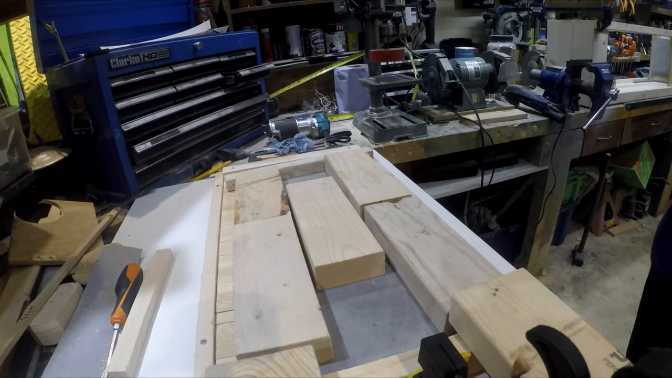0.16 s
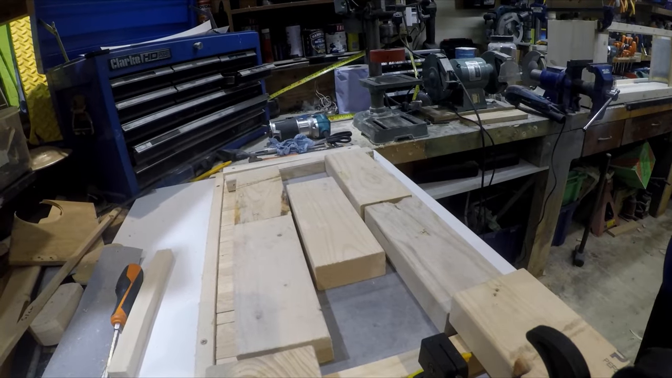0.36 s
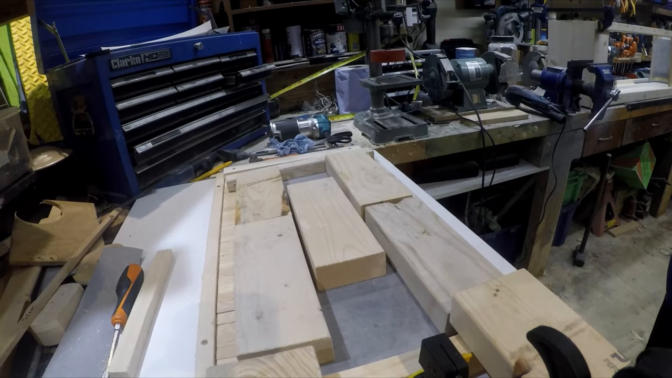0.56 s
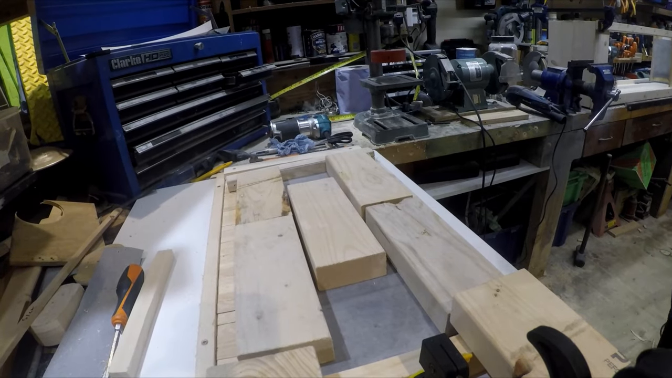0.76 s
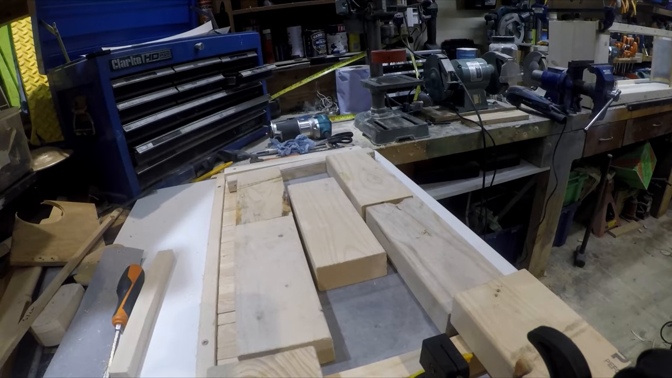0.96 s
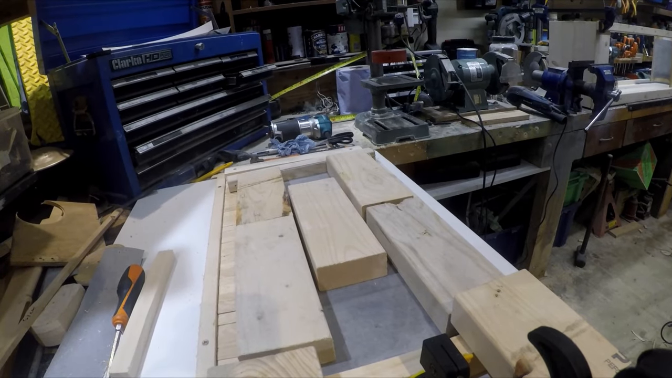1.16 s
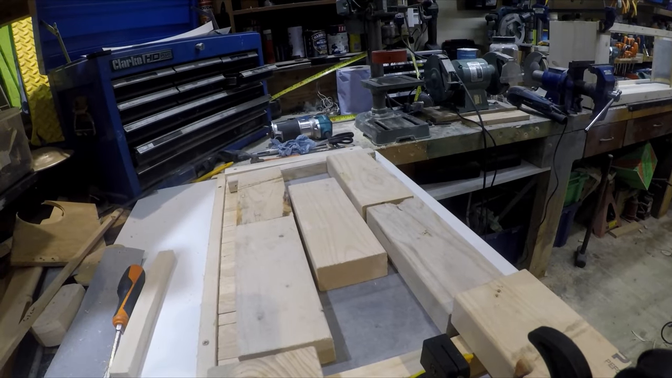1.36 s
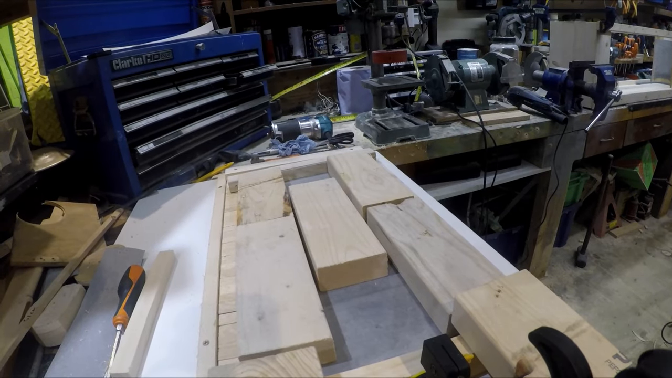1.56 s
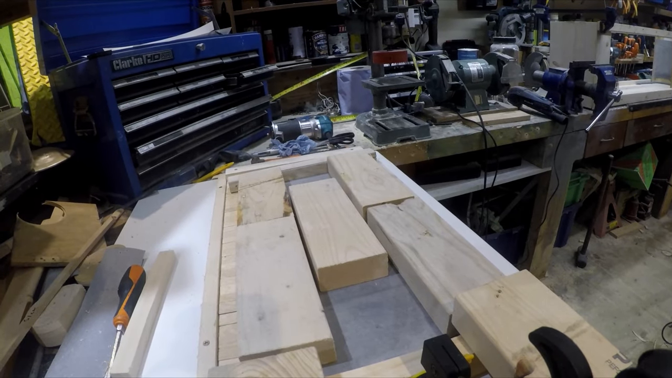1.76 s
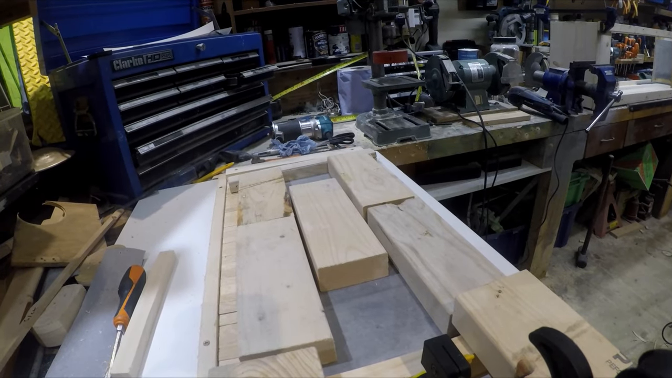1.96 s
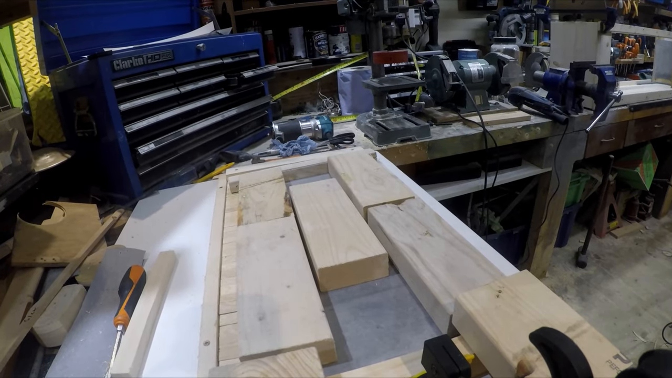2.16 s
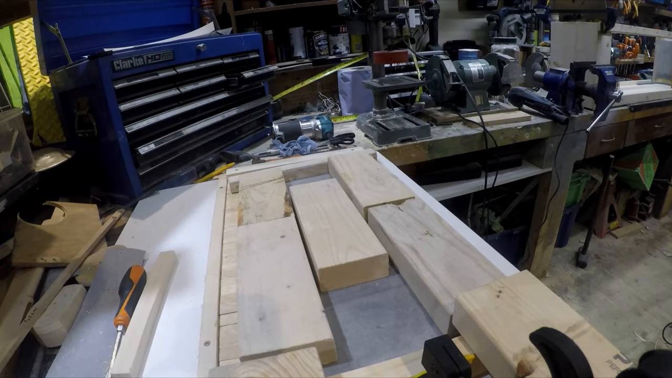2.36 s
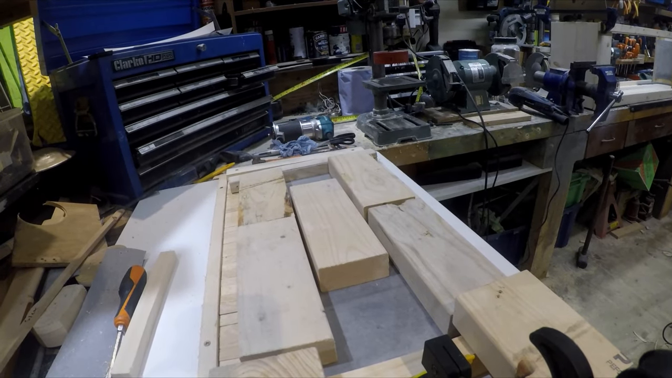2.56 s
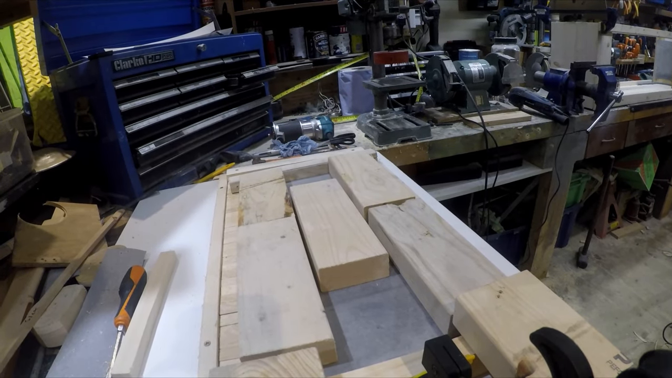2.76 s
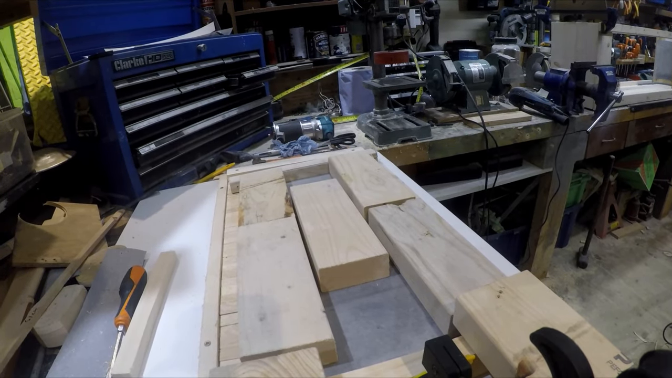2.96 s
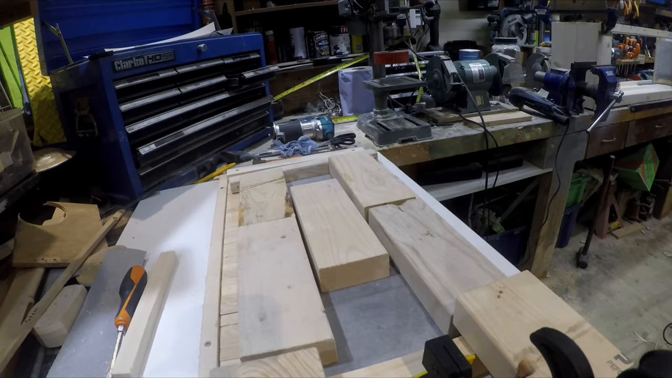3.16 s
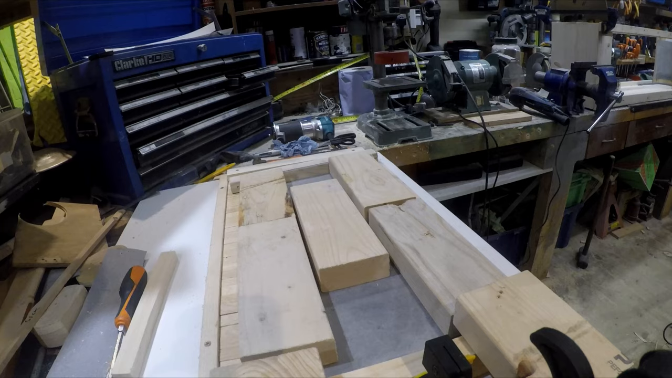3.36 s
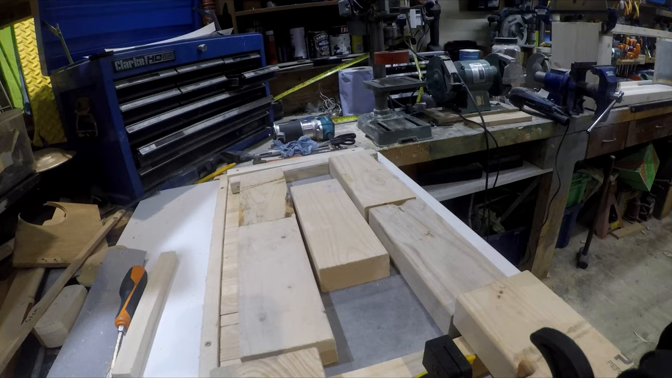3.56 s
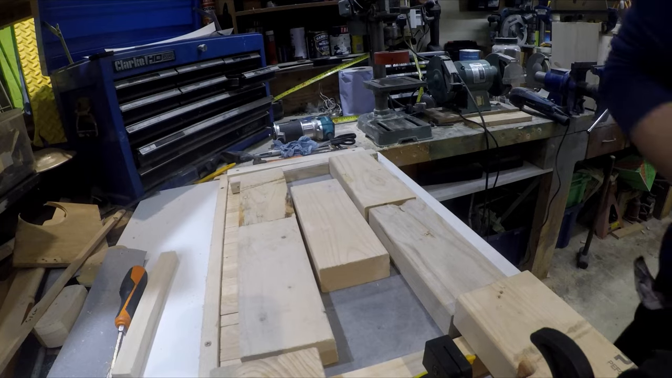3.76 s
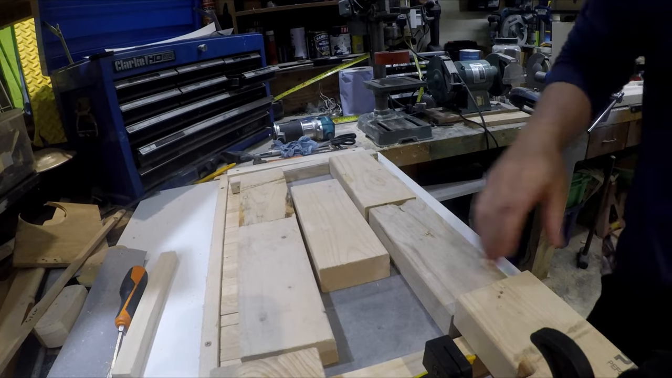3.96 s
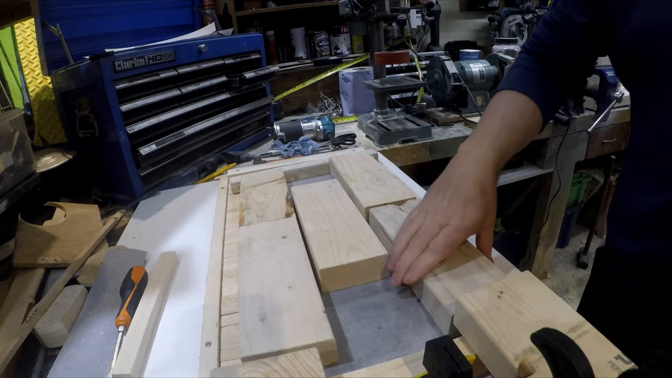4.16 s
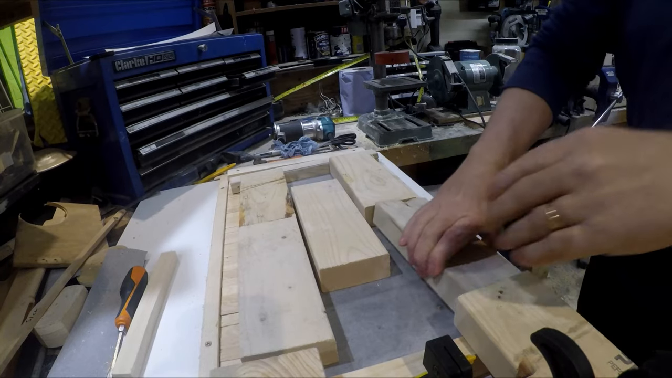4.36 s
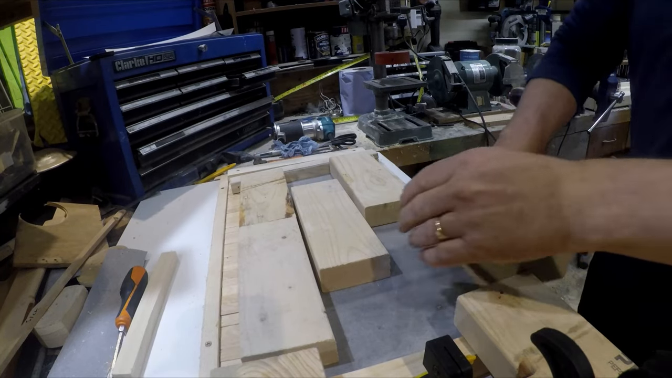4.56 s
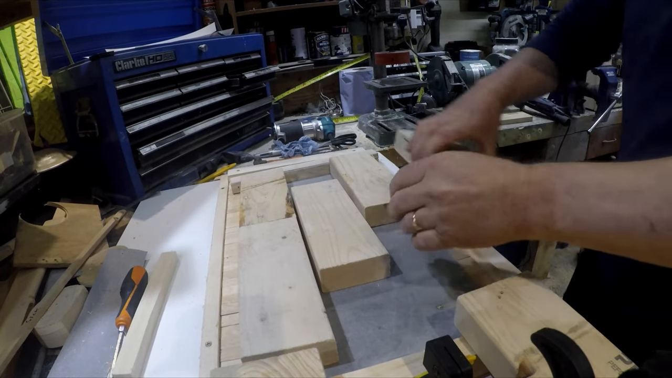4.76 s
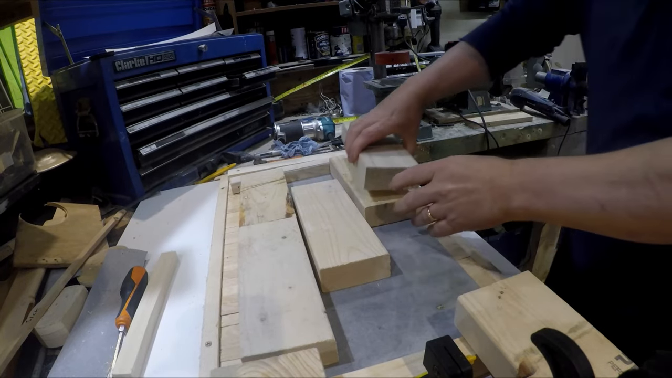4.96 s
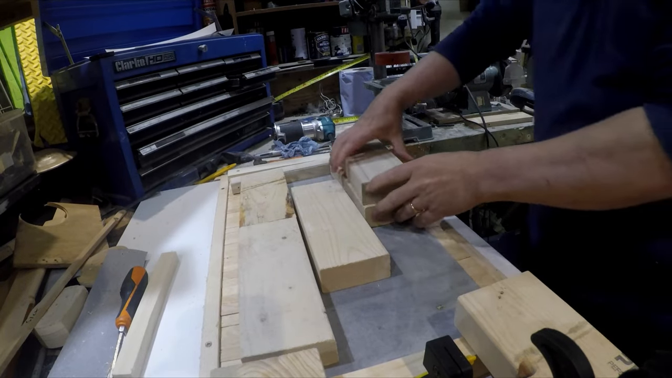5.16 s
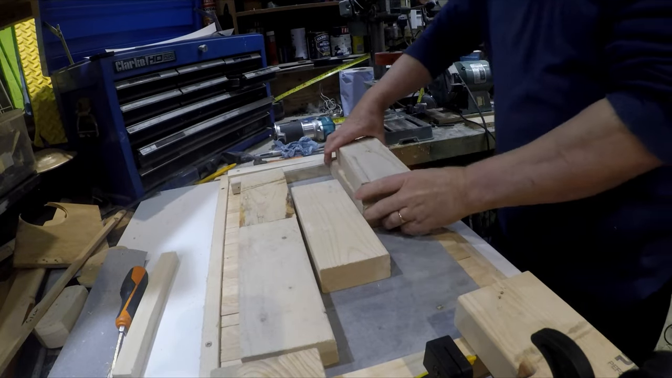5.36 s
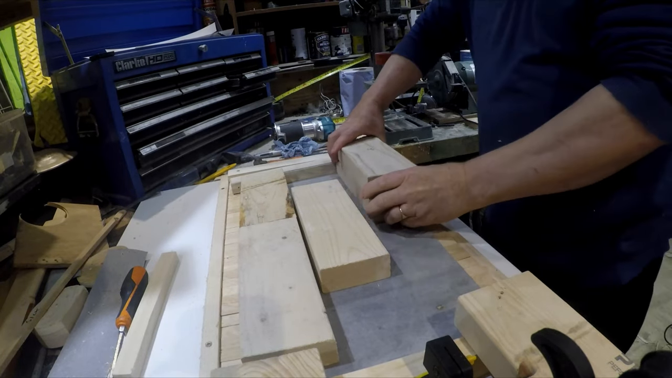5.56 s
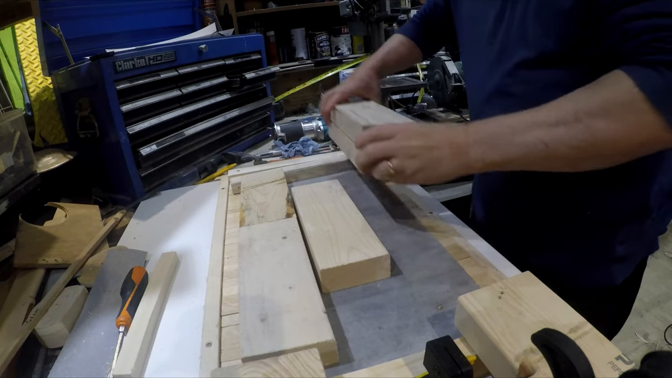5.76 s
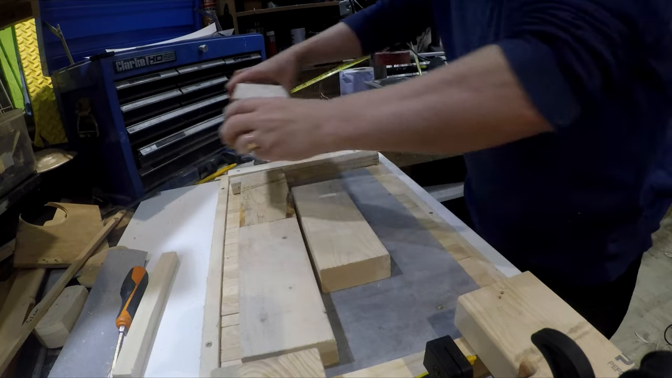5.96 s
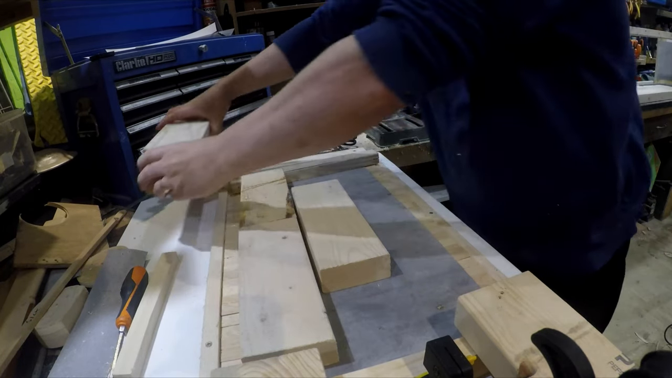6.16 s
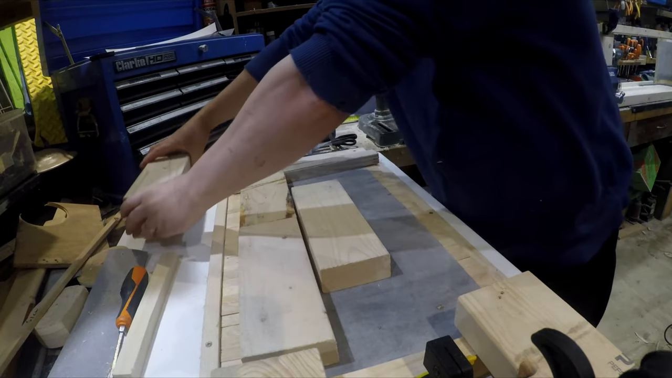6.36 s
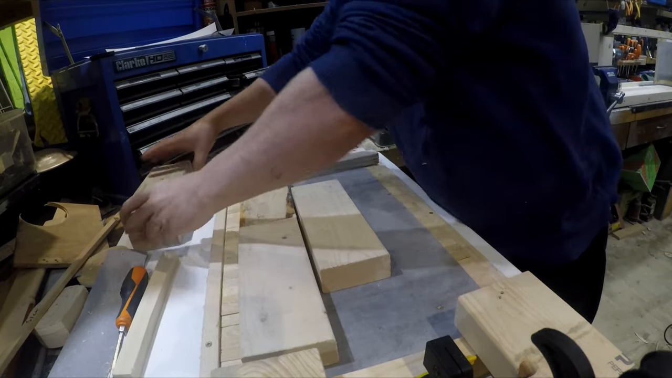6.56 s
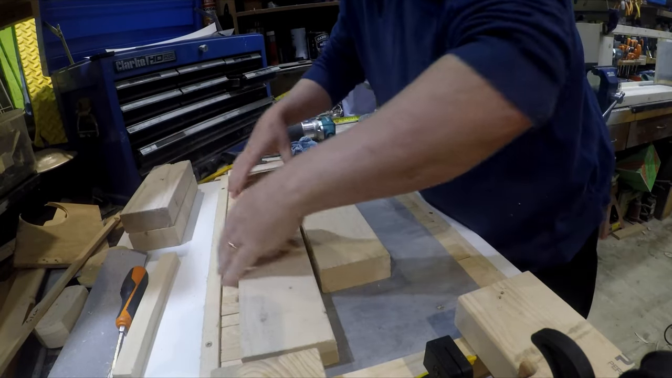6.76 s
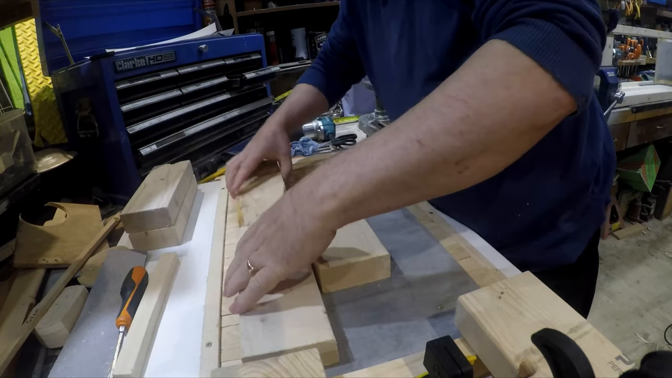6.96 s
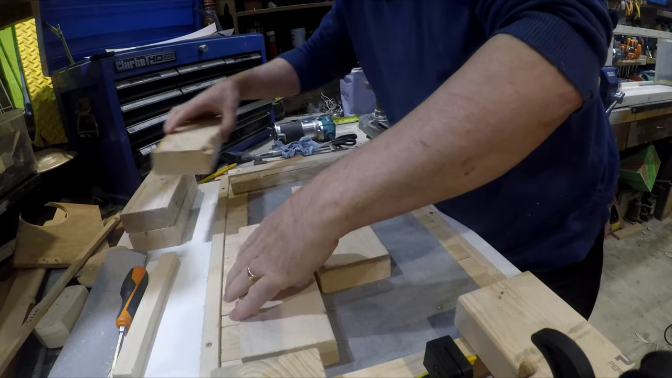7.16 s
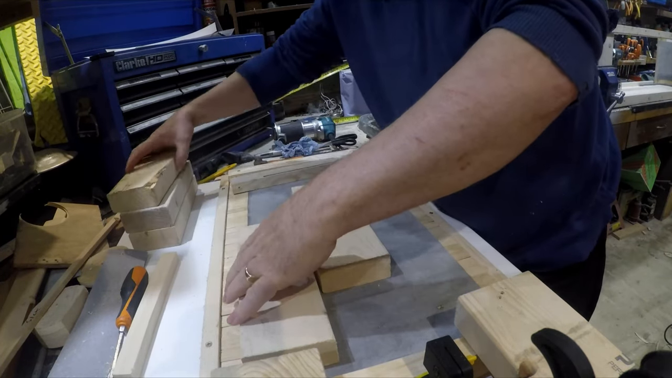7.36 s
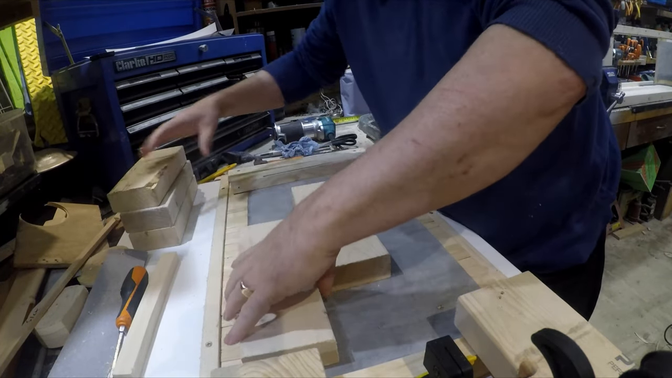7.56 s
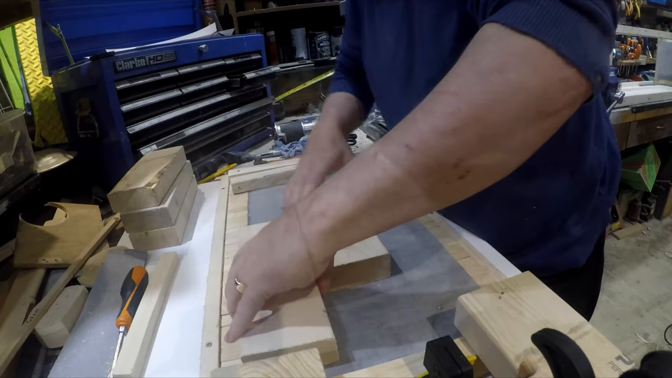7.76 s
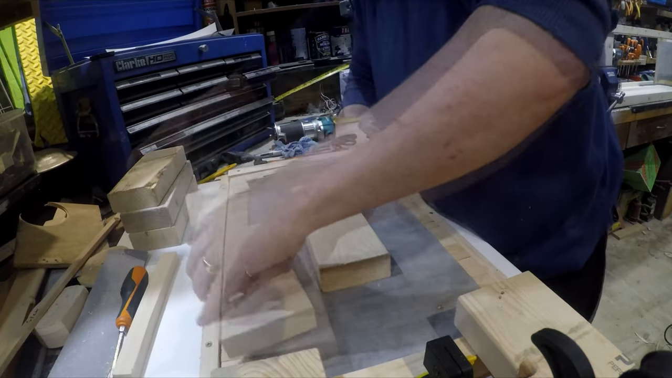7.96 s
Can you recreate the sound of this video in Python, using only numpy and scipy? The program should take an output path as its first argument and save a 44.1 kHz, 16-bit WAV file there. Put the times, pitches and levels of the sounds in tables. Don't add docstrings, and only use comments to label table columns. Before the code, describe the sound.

Wooden blocks bump, scrape and clack irregularly on a resonant workbench, with deep frame thuds and a buzzy rattle, then get stacked and fade out.

```python
import sys
import numpy as np
from scipy import signal
from scipy.fft import rfft, irfft, next_fast_len
from scipy.io import wavfile
from scipy.ndimage import uniform_filter1d

SR = 44100
rng = np.random.default_rng(int(sys.argv[2]) if len(sys.argv) > 2 else 0)


def store_wav(level_fs):
    pcm = np.round(np.clip(np.atleast_2d(level_fs), -1, 1) * 32767)
    wavfile.write(sys.argv[1], SR, pcm.T.astype(np.int16))


def convert_level_to_amplitude(level_db):
    exponent = np.asarray(level_db, float) / 20
    return 10 ** exponent


N = 357210


def evened(x):
    return x / np.sqrt(np.mean(x ** 2) + 1e-20)


def curve(rows, column):
    rows = np.array(rows)
    return np.interp(np.arange(N) / SR, rows[:, 0], rows[:, column])


def colour(x, points, lag_s=0.):
    size = next_fast_len(N + 4096)
    hz = np.arange(size // 2 + 1) * SR / size
    f, db = np.transpose(points)
    gain = convert_level_to_amplitude(np.interp(np.log(hz + 1), np.log(f + 1), db))
    delay = np.exp(-2j * np.pi * hz * lag_s)
    return irfft(rfft(x, size) * gain * delay, size)[..., :N]


def resonate(x, modes):
    out = 0
    for hz, width, db in modes:
        r = np.exp(-np.pi * width / SR)
        ring = signal.lfilter([1, 0, -1], [1, -2 * r * np.cos(2 * np.pi * hz / SR), r * r], x)
        out = out + convert_level_to_amplitude(db) * (1 - r) * ring
    return out


def pair(same):
    a, b = rng.standard_normal((2, N))
    return np.array([a, same * a + np.sqrt(1 - same ** 2) * b])


def lumps(width, db):
    smooth = uniform_filter1d(rng.standard_normal(N), width)
    smooth = uniform_filter1d(smooth, width)
    return convert_level_to_amplitude(db * evened(smooth))


def changed_level(before_db, after_db, ramp_s=0.49):
    change_s = 6.56
    share = np.clip((np.arange(N) / SR - change_s) / ramp_s, 0, 1)
    return before_db + share * (after_db - before_db)


# middle t/s, half length t/s, scrape level/dB, brushing hiss level/dB,
# scrape f/Hz
DRAGS = [(.01, 0.02, -40.5, -72, 540), (0.457, 0.12, -49, -91, 492), (0.687, 0.98, -62, -73, 314),
         (1.281, 0.037, -39, -70, 567), (2.11, 0.1, -39, -90, 323), (2.514, 0.26, -49.5, -57, 405),
         (2.667, 0.11, -40, -76, 292), (2.843, 0.0098, -48.5, -44, 390), (2.944, 0.12, -43, -58, 286),
         (3.223, 0.057, -52.5, -62, 285), (3.868, 0.59, -60.5, -72.5, 320), (4.357, 0.059, -57, -59, 400),
         (4.458, 0.13, -44.5, -68, 467), (4.593, 0.031, -44.5, -60, 627), (5.266, 0.042, -78, -92, 340),
         (6.018, 0.052, -40.5, -58, 637), (6.866, 0.08, -61, -72.5, 470)]


def strokes(column):
    t = np.arange(N) / SR
    return [convert_level_to_amplitude(row[column]) * np.exp(-((t - row[0]) / row[1]) ** 2) for row in DRAGS]


# f/Hz, width f/Hz, level/dB
TOP_MODES = [(160, 9, 2), (188, 22, -2), (240, 30, -8)]
# f/Hz, width f/Hz, level/dB
SLIDE_MODES = [(318.9, 4.7, 21), (390, 22.3, 13.5), (468.6, 17, 13.5), (592, 15, 8), (840, 116, -61.5)]


def bench():
    drags = strokes(column=2)
    top = resonate(pair(0.81) * lumps(500, 4.35), TOP_MODES)
    top = evened(resonate(top, [(182.0, 184, 0)]))
    slide = evened(resonate(pair(0.38) * lumps(150, 0.49), SLIDE_MODES))
    grit = rng.standard_normal(N) * lumps(120, 6.2)
    scrape = 0
    for gain, row in zip(drags, DRAGS):
        scrape = scrape + gain * evened(resonate(grit, [(row[4], 63, 0)]))
    top = top * (convert_level_to_amplitude(changed_level(-47.5, -64)) + convert_level_to_amplitude(2) * sum(drags))
    slide = slide * (convert_level_to_amplitude(changed_level(-51, -87.5)) + convert_level_to_amplitude(-0.5) * sum(drags))
    return colour(top + slide + scrape, [(95, -24), (140, 0)])


# f/Hz, level/dB per Hz
RUMBLE_COLOUR = [(11, -78), (18, 2.5), (38, 1), (54, 4.5), (70, -4.5), (102, -2), (130, -26), (170, -22),
                 (290, -120)]
# t/s, level/dB
SWAY = [(0.1, -59), (0.38, -49), (0.65, -44), (1.1, -60), (1.93, -68), (2.1, -35), (2.5, -41), (2.84, -40),
        (3.09, -38), (3.56, -43), (4.26, -51.5), (4.46, -36), (4.62, -64), (5.05, -52), (5.28, -53),
        (5.5, -52), (6.47, -58.5), (7.47, -53.5)]


def rumble():
    tremble = evened(colour(pair(0.95) * lumps(900, 2.16), RUMBLE_COLOUR))
    return tremble * convert_level_to_amplitude(curve(SWAY, column=1))


# f/Hz, level/dB per Hz
AIR_COLOUR = [(35, 6), (60, 5), (167, -2.5), (799, -14.5), (1060, -16.5), (1220, -21.5), (2500, -24.5),
              (6990, -34), (9680, -34), (13400, -39), (15800, -63)]
# f/Hz, level/dB
SCUFF_COLOUR = [(3500, 4.5), (5000, 4.5), (7500, 7), (10500, -0.5), (11500, -6), (14500, -29), (15500, -57)]


def air():
    scuff = evened(colour(rng.standard_normal(N), SCUFF_COLOUR)) * lumps(300, 6.9)
    scuff = scuff * (convert_level_to_amplitude(changed_level(-71, -103)) + sum(strokes(column=3)))
    still_air = evened(colour(pair(1.0), AIR_COLOUR)) * convert_level_to_amplitude(changed_level(-70.5, -54) + 1.1 * jostle())
    return still_air + scuff * np.array([[1], [.3]])


# f/Hz, level/dB
BUZZ_RIGHT = [(110, -13), (300, 18.5), (800, 9), (1500, 2), (3600, -6.5), (5000, -6), (6200, 2.5),
              (7000, -2), (7900, 3), (8800, -3), (9700, 1), (10600, -6.5), (14200, -12.5), (15000, -25),
              (15700, -71)]
# f/Hz, level/dB
BUZZ_LEFT = [(110, -37), (300, -43), (800, 6.5), (2000, -1.5), (4400, -14.5), (4650, -19), (4900, -52),
             (15000, -71)]
# f/Hz, width f/Hz, level/dB
CAVITY_MODES = [(4400, 130, -15), (6240, 95, -4), (7915, 100, 0), (9720, 95, -3), (11500, 160, -17)]
# f/Hz, level/dB
FIZZ_COLOUR = [(10500, -59.5), (11600, 5.5), (13500, 6), (15300, 5), (16000, -7)]


def loose_part(shaking):
    slide_s = 0.96
    swing = uniform_filter1d(shaking, 24)
    size = (swing ** 2 + 0.0065 ** 2) ** (1.02 / 2)
    outward = np.maximum(swing, 0)
    shared, own, ring, fizz = (evened(v) for v in rng.standard_normal((4, N)))
    ring = ring * lumps(250, 4.5)
    buzz_gain = convert_level_to_amplitude(changed_level(-8, -38, slide_s) + 0.81 * jostle())
    fizz_gain = convert_level_to_amplitude(changed_level(-58.5, -11, slide_s) + 0.54 * jostle())
    right = colour(shared * size * buzz_gain, BUZZ_RIGHT)
    right += convert_level_to_amplitude(13.0) * resonate(ring * outward * buzz_gain, CAVITY_MODES)
    right += colour(fizz * abs(swing) ** 1.12 * fizz_gain, FIZZ_COLOUR)
    left = -colour((shared + .45 * own) * size * buzz_gain, BUZZ_LEFT, lag_s=.000105)
    return np.array([left, right])


# f/Hz, level/dB, share of the ring time
BLOCK_MODES = [(345, -4.5, 1), (479, -4, 1), (582, 0, 1), (821, 2.5, 0.67), (930, -18, 0.35),
               (1227, -27, 0.59), (1650, -20, .5), (2190, -30.5, 0.2)]


def strike(low_hz, high_hz, share_db, ring_s, draw):
    t = np.arange(8000) / SR
    press = (1 + 1.05 * draw) * t[:700]
    soft_push = press * np.exp(-t[:700] / 0.0012)
    hard_push = press * np.exp(-t[:700] / 0.0005)
    low_decay = convert_level_to_amplitude(-60 * t / (1.42 * ring_s) * (low_hz / 190) ** 0.24)
    low = np.sin(2 * np.pi * low_hz * t) * low_decay
    low += 0.025 * np.sin(2 * np.pi * 178 * t) * convert_level_to_amplitude(-60 * t / 0.98)
    modes = [(high_hz, 5, .9)]
    for k, (f, db, share) in enumerate(BLOCK_MODES):
        modes.append((f * (1 + 0.086 * draw[-k - 1]), db, share))
    high = sum(convert_level_to_amplitude(db - 60 * t / (share * ring_s)) * np.sin(2 * np.pi * f * t) for f, db, share in modes)
    low = signal.fftconvolve(soft_push, low)[:8000]
    high = signal.fftconvolve(hard_push, high)[:8000]
    return low / abs(low).max() + convert_level_to_amplitude(share_db) * high / abs(high).max()


# t/s, peak level/dB, bench f/Hz, block f/Hz, block share level/dB
BUMPS = [(0.151, -10.5, 222, 492, -0.5), (0.17, -5, 184, 454, -6), (0.19, -13.5, 198, 380, -12),
         (0.228, -11.5, 197, 425, -3), (.243, -20.5, 194, 350, -1), (0.257, -12.5, 192, 517, -9),
         (0.276, -17, 174, 462, 1), (0.308, -16.5, 198.5, 282, -7), (.41, -34.5, 191, 362, 11),
         (0.455, -29.5, 192, 484, 10), (0.505, -28, 200, 374, 1.5), (.625, -45, 172, 464, 8),
         (1.227, -34, 238, 348, 4), (1.243, -24.5, 231, 368, 5), (1.255, -29, 200, 584, 6),
         (1.264, -22.5, 218, 600, 3), (1.277, -21, 168.6, 370, -1.5), (1.293, -30, 178, 345, 4),
         (1.939, -10.5, 235, 334, -13.5), (1.955, -15, 237, 430, 0), (1.99, -17.5, 267.6, 313.4, 3),
         (2.009, -25, 227, 313, 8.5), (2.085, -18.5, 240, 400, -20), (2.154, -17.5, 245, 345, -9),
         (2.172, -14.5, 209, 295, -14), (2.19, -36.5, 232, 345, -8), (2.279, -24, 234, 290, -14),
         (2.458, -25.5, 207, 353, -3), (2.482, -19.5, 242, 410, 0), (2.502, -24, 225, 293, 3),
         (2.566, -33, 256, 300, -2), (2.594, -28, 207, 555, -13), (2.649, -14, 204, 358, -1),
         (2.689, -25.5, 252, 425, -19), (2.761, -25, 229, 295, -2), (2.898, -24, 262, 315, 4),
         (2.955, -27, 250, 310, 2), (2.979, -25, 202, 294, 3), (3.253, -33, 226, 363, -5),
         (3.57, -25.5, 123, 660, -3.5)]
# t/s, peak level/dB, bench f/Hz, block f/Hz,
# block share level/dB
LIFTS = [(4.291, -25, 201, 347, -8), (4.304, -24.5, 208, 390, -7), (4.328, -34, 212, 474, 7),
         (4.363, -18.5, 242, 448, 5), (4.385, -31, 171, 410, -3), (4.413, -12, 219, 603, -3),
         (4.44, -17.5, 193, 600, -1.5), (4.477, -32, 172, 477, 16.5), (4.508, -24, 217, 623, 12),
         (4.531, -13, 241, 390, 0), (4.554, -19, 184, 600, 3.5), (4.577, -29, 205, 498, 13),
         (4.612, -28, 178, 614, 6.5), (5.066, -20.5, 151, 332, -6), (5.077, -8, 164.8, 504, 3),
         (5.08, -26.5, 263, 345, 9), (5.0895, -30.5, 196, 470, 7), (5.1005, -15, 198.3, 383, -4.5),
         (5.122, -20, 179, 410, -7), (5.334, -28.5, 165, 337, -18), (5.549, -20.5, 187, 330, -11),
         (5.58, -30.5, 175, 386, -16), (5.931, -39, 161, 620, 14), (5.945, -31.5, 207, 436, -2),
         (5.997, -31.5, 184, 650, 8), (6.012, -36, 182, 440, 16.5), (6.028, -30, 199, 630, 9),
         (6.049, -26, 173, 635, -15)]
# t/s, peak level/dB, bench f/Hz, block f/Hz,
# block share level/dB
STACKS = [(6.465, -17.5, 159.6, 557, -4), (6.4795, -13, 168, 522, 7.5), (6.484, -27, 165, 610, 11),
          (6.49, -31, 200, 385, 12), (6.4935, -26, 163, 498, 16.5), (6.507, -16.5, 177, 403, -12),
          (6.528, -22, 184, 398, -22), (6.575, -20.5, 153, 440, -6), (6.626, -22, 153, 350, -3),
          (6.67, -28.5, 162, 375, -20.5), (7.382, -16, 272, 420, 0.5), (7.406, -16, 230, 490, 4),
          (7.422, -33, 192, 348, 15.5), (7.841, -35, 240, 304, -23)]


def knocks():
    out = np.zeros(N + 8000)
    for blows, ring_s in ((BUMPS, 0.092), (LIFTS, 0.08), (STACKS, 0.079)):
        for s, db, low_hz, high_hz, share_db in blows:
            blow = strike(low_hz, high_hz, share_db, ring_s, rng.standard_normal(700))
            out[round(s * SR):][:8000] += convert_level_to_amplitude(db) * blow
    no_bass = signal.butter(5, 128, "high", fs=SR, output="sos")
    return signal.sosfiltfilt(no_bass, out[:N]) * np.ones((2, 1))


# t/s, peak level/dB, f/Hz, contact t/s
CRACKS = [(0.151, -29.5, 1110, 0.003), (.228, -38, 700, 0.0037), (.455, -41, 700, .003),
          (0.629, -47, 1480, 0.0084), (1.228, -36, 900, .004), (1.256, -31, 900, 0.008),
          (1.266, -34, 1600, .01), (1.276, -20, 1100, 0.0054), (1.941, -14, 950, 0.006),
          (2.094, -21, 1200, .004), (2.157, -22, 1000, .004), (2.208, -24, 1240, .004),
          (2.28, -23, 1220, .004), (2.722, -22, 1230, .004), (4.364, -18, 1000, 0.0025),
          (4.414, -36, 1200, 0.0026), (4.479, -35, 800, .003), (4.508, -41, 900, 0.003),
          (5.077, -21, 960, 0.0022), (5.0775, -17, 1360, 0.0028), (6.479, -11.5, 900, 0.003),
          (6.479, -26.5, 1720, 0.0027), (6.496, -31, 1000, .004), (7.387, -28, 1220, 0.007),
          (7.411, -22.5, 1090, 0.0089), (7.79, -44, 2300, 0.0034), (7.885, -48, 2680, .006),
          (7.834, -52, 1000, 0.0072)]


def cracks():
    out = np.zeros(N)
    for s, db, hz, contact_s in CRACKS:
        burst = rng.standard_normal(2500) * np.exp(-np.arange(2500) / SR / contact_s)
        burst[0] = 14
        ring = resonate(burst, [(hz, 220, 0), (1.45 * hz, 500, -12)])
        out[round(s * SR):][:2500] += convert_level_to_amplitude(db) * ring / abs(ring).max()
    return out


def room(x):
    taps = np.sign(rng.standard_normal((2, 15000))) * (rng.random((2, 15000)) < .05)
    taps = taps * convert_level_to_amplitude(-60 * np.arange(15000) / SR / .25)
    taps[:, :250] = 0
    taps = taps / np.linalg.norm(taps, axis=1, keepdims=True)
    return signal.fftconvolve(x, taps, axes=1)[:, :N]


# t/s, level/dB above rest, rise t/s, fall level/dB per s
JOSTLES = [
    (1.94, 6.5, 0.0064, 7.5),
    (0.552, 7.5, .02, 31),
    (7.377, 18.5, 0.0071, 130),
    (7.8, 11, 0.034, 122),
]


def jostle():
    t = np.arange(N) / SR
    total = 0
    for s, db, rise_s, fall in JOSTLES:
        height = np.maximum(db - fall * np.maximum(t - s - rise_s, 0), 0)
        total = total + height * np.clip((t - s) / rise_s, 0, 1)
    return total


# t/s, peak level/dB, f/Hz, 60 dB decay t/s, first swing direction
JOLTS = [(0.62, -34, 36, 0.45, -1), (1.939, -27, 62, 0.2, -1), (2.018, -24, 42, 0.08, 1),
         (2.086, -17, 66, 0.15, -1), (2.154, -17, 58, 0.2, -1), (2.204, -20, 52, 0.12, -1),
         (2.24, -23, 45, 0.09, 1), (2.271, -18, 60, 0.11, 1), (2.357, -27, 45, .15, -1),
         (2.458, -23, 58, 0.15, 1), (2.51, -24, 45, 0.1, 1), (2.546, -22, 62, 0.3, 1),
         (2.591, -16.5, 56, 0.14, -1), (2.655, -20, 45, .1, 1), (2.668, -16.5, 54, 0.14, -1),
         (2.708, -16, 49, 0.25, 1), (2.76, -20, 50, 0.4, 1), (2.826, -26, 42, .4, -1),
         (2.93, -26, 55, .15, -1), (2.984, -26, 63, .6, 1), (3.186, -26, 60, .1, 1),
         (3.227, -19, 52, 0.11, -1), (3.278, -20, 48, 0.22, -1), (3.577, -32, 60, 0.15, 1),
         (4.3, -36, 50, .3, 1), (4.45, -34, 51, 0.95, 1), (5.1, -38, 50, .9, 1), (5.559, -33, 50, 0.58, 1),
         (5.61, -33, 55, .3, -1), (5.98, -40, 56, 0.34, 1), (6.469, -29, 80, 0.098, 1),
         (6.556, -33, 51, 0.73, 1), (7.408, -31, 62, 0.2, 1), (7.443, -31, 60, .25, -1),
         (7.482, -31, 58, .3, -1)]


def jolts():
    t, out = np.arange(16000) / SR, np.zeros(N + 16000)
    for s, db, hz, decay_s, way in JOLTS:
        rise = 1 - np.exp(-t / .006)
        swing = np.sin(2 * np.pi * hz * t) * convert_level_to_amplitude(-60 * t / decay_s) * rise
        out[round(s * SR):][:16000] += way * convert_level_to_amplitude(db - 1.5) * swing / abs(swing).max()
    return out[:N]


# t/s, left over right level/dB, share of the far end 0-1, share of the stack 0-1
PLACE = [(0, 2, 0, 0), (1.1, 2, 0, 0), (1.2, 3.5, 0, .7), (1.4, 3.5, 0, .7), (1.8, 3, 0, 0),
         (2.75, 3, 0, 0), (2.85, 3, 0, .7), (4.1, 3, 0, .3), (4.3, -2.5, 1, 0), (5.45, -2.5, 1, 0),
         (5.53, 2, 0, .7), (6.3, 2, 0, .7), (6.42, -3, 1, 0), (6.66, -3, 1, 0), (6.75, 0, 0, 1),
         (8.1, 0, 0, 1)]
# f/Hz, lead/rad from the near end, lead/rad from the
LEAD = [(90, .1, -.6), (250, .35, -1.3), (340, .3, -3.1), (500, .7, -5.8), (620, 3., -5.2),
        (780, 3.4, -2.3), (1000, 3.7, -2.), (4400, 5.6, -.7)]


def placed(x):
    hz = np.fft.rfftfreq(N, 1 / SR)
    f, near_lead, far_lead = np.transpose(LEAD)
    spectrum = rfft(x[1])
    near = irfft(spectrum * np.exp(1j * np.interp(hz, f, near_lead)), N)
    far = irfft(spectrum * np.exp(1j * np.interp(hz, f, far_lead)), N)
    far_share, stack_share = curve(PLACE, column=2), curve(PLACE, column=3)
    right = far_share * far + stack_share * x[1] + (1 - far_share - stack_share) * near
    return np.array([x[0], right]) * convert_level_to_amplitude(curve(PLACE, column=1) * np.array([[.5], [-.5]]))


def scene():
    blows, edges = knocks(), cracks()
    frame = (rumble() + jolts()) * convert_level_to_amplitude([[1.8], [-1.8]])
    echoes = convert_level_to_amplitude(-11.0) * room(blows + edges)
    on_top = bench() + blows + edges * convert_level_to_amplitude([[-5], [0]]) + echoes
    return frame + placed(on_top) + air()


def roll_off(x):
    return signal.sosfilt(signal.butter(12, 16510, fs=SR, output="sos"), x)


# f/Hz, level/dB
TREBLE_EDGE = [(20, 0), (14800, 0), (15300, -8), (15800, -70)]


def record(dry):
    fade_s, fade_db_per_s = 7.663, 26.5
    fade = convert_level_to_amplitude(-fade_db_per_s * np.maximum(np.arange(N) / SR - fade_s, 0))
    mix = fade * (dry + loose_part(dry[1]))
    return roll_off(colour(mix, TREBLE_EDGE))


dry = scene()
out = record(dry)
store_wav(out)
```